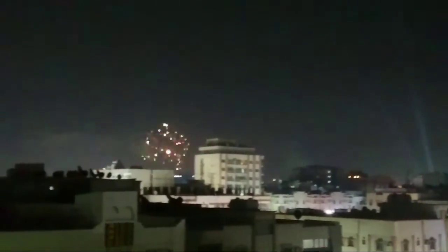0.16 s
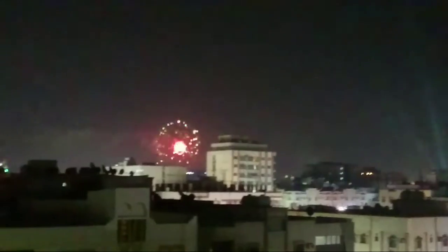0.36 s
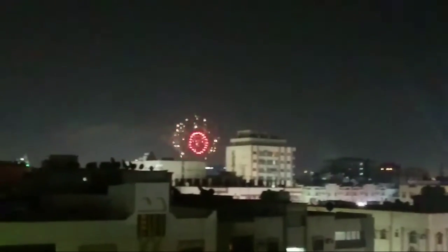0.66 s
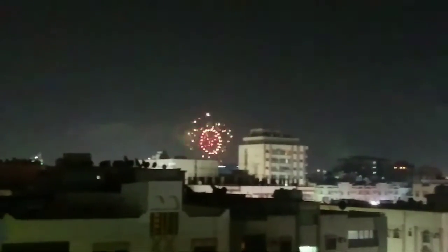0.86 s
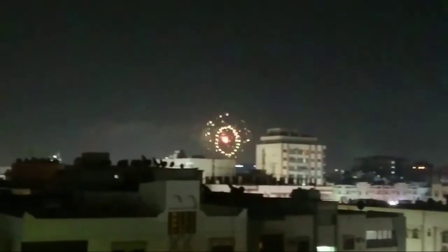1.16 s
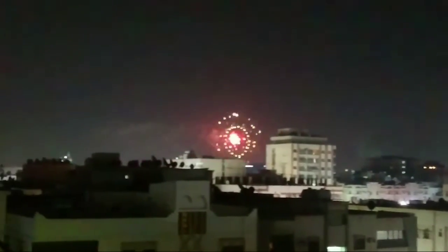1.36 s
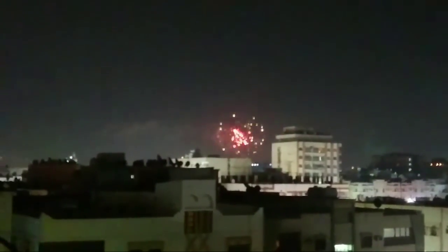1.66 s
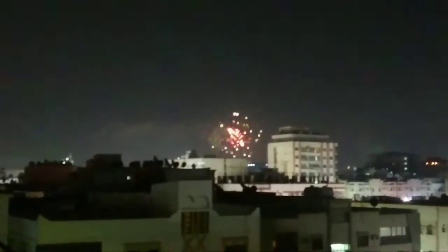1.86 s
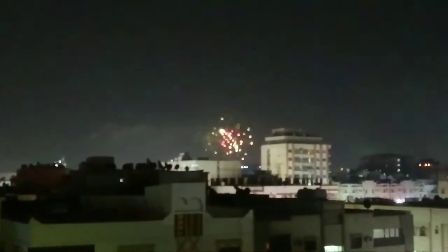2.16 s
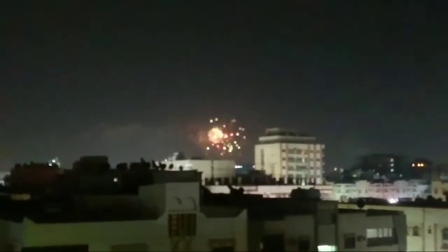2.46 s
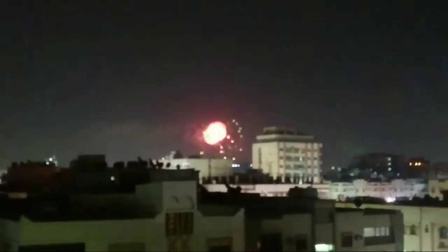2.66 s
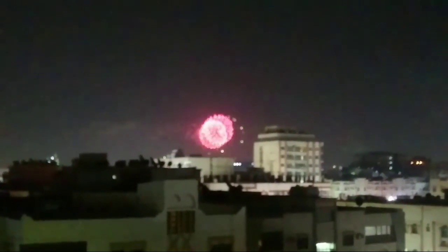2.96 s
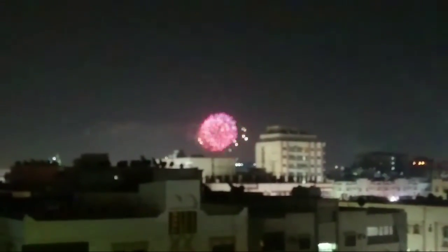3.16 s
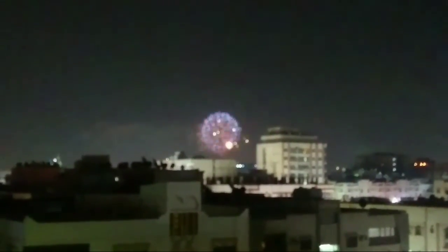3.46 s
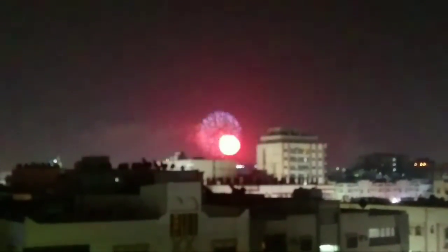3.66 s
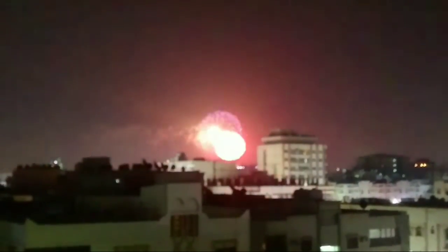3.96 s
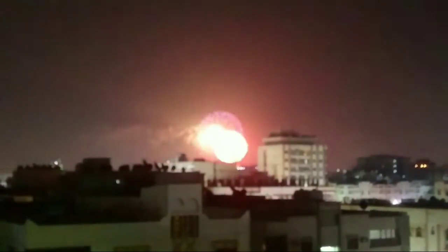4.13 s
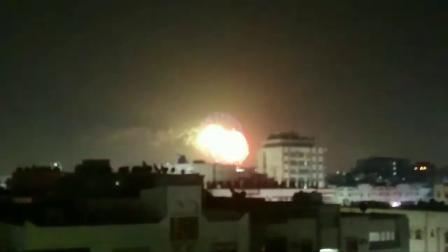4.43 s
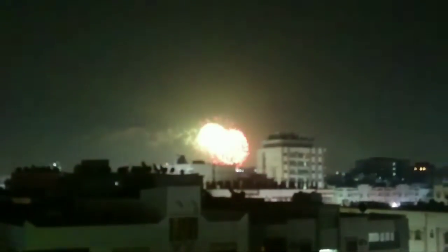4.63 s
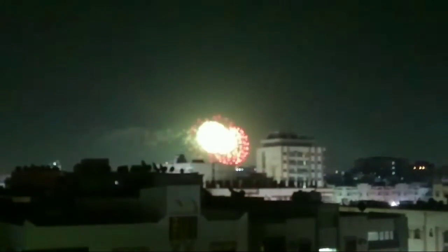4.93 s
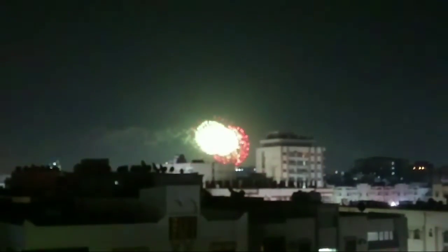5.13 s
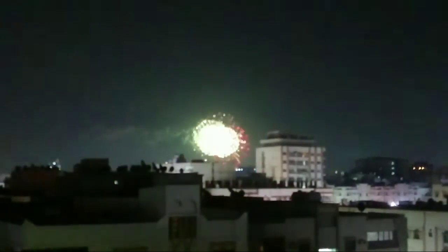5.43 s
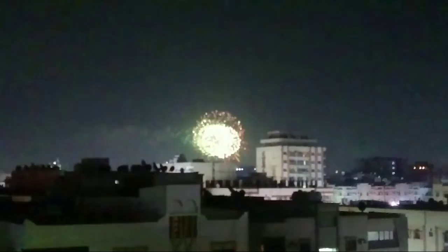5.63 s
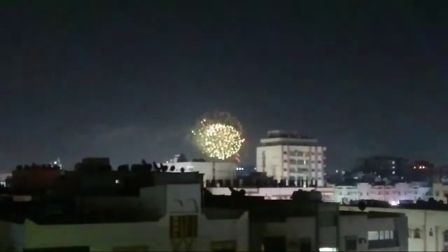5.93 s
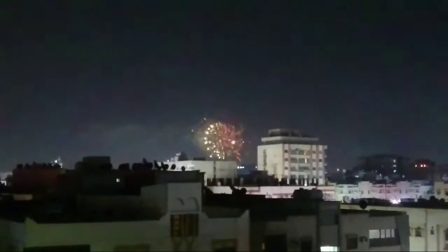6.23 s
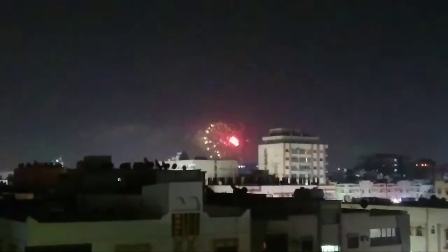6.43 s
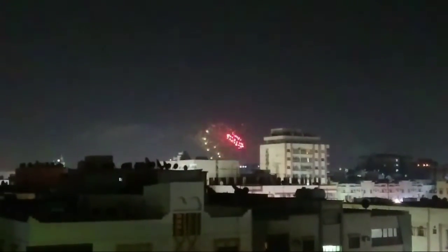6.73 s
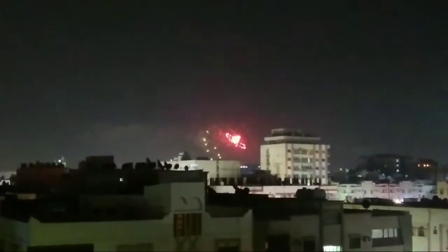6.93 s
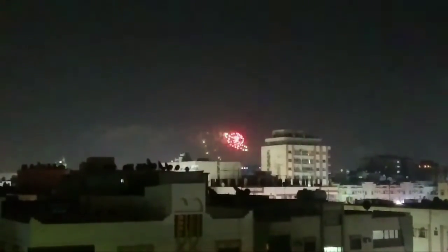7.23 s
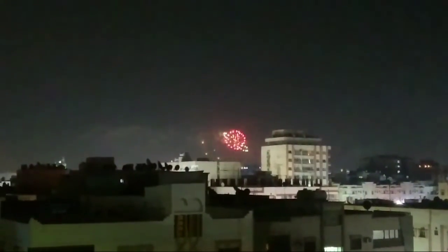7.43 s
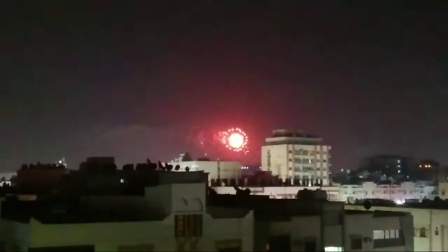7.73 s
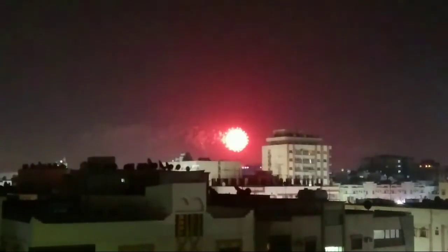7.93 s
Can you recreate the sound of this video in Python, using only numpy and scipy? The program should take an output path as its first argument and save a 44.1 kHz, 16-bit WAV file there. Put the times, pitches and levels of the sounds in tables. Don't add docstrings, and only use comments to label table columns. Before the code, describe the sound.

Distant aerial fireworks heard from a walled roof terrace. Rapid, overlapping bangs open the scene, thin out into weaker thumps and rumble, then give way to two close-spaced strong bangs, another alone, a long rumbling gap and two last ones. Each has a short dry crack, deep boom, quick echoes and rolling tail. Steady dull city hum sits underneath, stereo and slightly heavier on one side.

```python
import sys
import numpy as np
from scipy import signal
from scipy.fft import rfft, irfft
from scipy.io import wavfile
from scipy.ndimage import uniform_filter1d

SR = 44100
rng = np.random.default_rng(int(sys.argv[2]) if len(sys.argv) > 2 else 0)


def master_out(mix):
    frames = np.transpose(np.atleast_2d(mix))
    ceiling = np.clip(frames, -1, 1)
    pcm = np.round(ceiling * 32767).astype(np.int16)
    wavfile.write(sys.argv[1], SR, pcm)


def to_linear_factor(level_db):
    exponent = np.asarray(level_db, float) / 20
    return 10 ** exponent


N = 356769

# f/Hz, density/dB per Hz
TOWN_HUM = [(15, -47), (25, -47.5), (48, 6.5), (151, 2), (202, -16), (232, 7.5), (261, -8.5), (295, -2.5),
            (615, -8.5), (730, -9.5), (1500, -16.5), (1950, -49.5), (3300, -120)]
# f/Hz, density/dB per Hz
TOWN_HISS = [(1200, -25), (1500, 1), (2100, -1), (3000, -6), (4000, -6.5), (5500, -9), (6400, -8.5),
             (7300, -16), (8500, -21.5), (11000, -21), (12000, -28.5), (13500, -21.5), (14900, -30.5)]
TOWN_HUM_DB, TOWN_HISS_DB = -44.5, -57.5
# f/Hz, correlation
PORT_LIKENESS = [(60, 0.22), (100, 1), (300, 0.63), (520, 0.64), (900, 0.39), (1500, 0.45), (2600, 0.08),
                 (6000, 0.092), (12000, 0.3)]
# f/Hz, level/dB
TOWN_LEAN = [(60, -5), (110, -5.5), (210, -6.5), (390, -2.5), (740, -3.5), (1390, -2.5), (2600, -3.0)]
# f/Hz, width/Hz, level/dB
FANS = [(233, 2.2, -58), (1062, 24, -69.5), (1140, 10, -93), (542, 6.9, -73.5)]

# t/s, blast
# level/dB, boom level/dB, blast length/ms, echo level/dB
BURSTS = [(0.4109, -22, -41.5, 0.82, -36), (.416, -15, -17.5, 0.8, -30.5), (0.65, -12, -14.5, 0.56, -40),
          (.719, -14.5, -7.5, 0.6, -32), (0.7859, -13.5, -14, 0.7, -37), (1.045, -24, -14.5, 0.94, -45),
          (1.058, -16, -15.5, 0.58, -41.5), (1.133, -20, -26, .45, -36), (1.1599, -8.5, -12, 0.65, -28.5),
          (1.726, -27.5, -21.5, 0.6, -39.5), (1.756, -19.5, -19, 0.68, -44), (1.812, -17.5, -22, 0.89, -45),
          (1.847, -31, -27.5, 0.87, -44), (2.084, -27.5, -20.5, .9, -59), (2.089, -24.5, -34, 0.71, -40),
          (2.138, -31.5, -32, 0.73, -49), (2.401, -36.5, -33.5, 0.7, -49), (3.6784, -8.5, -13, 0.53, -27.5),
          (4.0246, -10.5, -13, .6, -35), (4.0996, -27, -53, .35, -50), (5.1158, -10.5, -13, .71, -28.5),
          (7.257, -10.5, -14, 0.68, -32.5), (7.9825, -7.5, -15, 0.62, -39)]
# delay/ms, left level/dB, right level/dB
WALLS = [(4.9, -8, -9), (6.6, -16, -18), (10.2, -16, -17), (15.5, -20, -20)]
# delay/ms, level/dB, left port later by/ms, bass lost below f/Hz, treble lost above f/Hz
FACADES = [(75.3, -5, .1, 1200, 3000), (189, -9, -.2, 450, 1500), (252.2, -1, .3, 420, 2500),
           (257.5, -8, 0, 400, 1200), (320, 1, .35, 450, 1300), (330, -11, .35, 300, 800),
           (356, -3, .35, 900, 6000), (415, -17, .2, 400, 1200), (490, -18, .2, 400, 1200)]
# f/Hz, level/dB, t60/s, polarity at the microphone
TERRACE_MODES = [(59.56, -23, 1.65, -1.7), (72.9, -2, 0.49, 0.66), (74.9, -9, 1.6, 0.43),
                 (85.1, -24, 2.2, -1.22), (94, -10.5, 1.11, 0.87), (103.5, -28, 5.1, 0.97),
                 (115.5, 6.5, 0.29, -0.33), (153.6, -3, 0.35, -0.48), (185, 4, 0.12, -0.48),
                 (208.7, -13, 0.5, -0.59), (224.4, -2, 0.54, -0.084), (272.5, -20, 0.67, -0.91),
                 (343, -28, 0.47, 0.82), (324.9, -7, 0.3, 0.57), (390, -11.5, 0.077, -1.6),
                 (427, -2, 0.34, 0.07), (597, -25, 0.027, 0.5)]
# f/Hz, t60/s
ROLL_DECAY = [(50, 4.9), (120, 2.7), (300, 2.17), (800, 3.1), (2500, 2.36)]
# f/Hz, level/dB
ROLL_COLOUR = [(40, 3.5), (90, 12.5), (200, 21), (500, -7), (1200, -5.5), (3000, 2)]
# t/s, level/dB
THUDS = [(1.889, -26), (1.965, -29), (2.206, -38), (2.287, -25), (2.481, -35), (2.554, -29), (2.675, -32),
         (2.736, -30), (4.641, -43), (4.868, -29), (5.722, -34.5), (6.347, -33), (7.508, -22)]
# f/Hz, level/dB
FIREWORKS_LEAN = [(60, -6.5), (130, -3), (270, -5.5), (580, -1.5), (1220, -2), (2600, -2)]

SWELL_MS, SWELL_MS_PER_DB, SHORTEST_SWELL_MS = 4.03, 0.63, 1.1
SPLASH_DB, SPLASH_HZ, SPLASH_T60_S = -12, 2200, 0.033
OPEN_SHARE = 0.72
HIDDEN_DB, ROLL_DB_PER_DB = -16, 0.4
LUMPY_DB = 4.5
THUD_THIN_HZ = 124


def evened(x):
    return x / np.sqrt(np.mean(x ** 2) + 1e-20)


def read(points, hz):
    f, value = np.transpose(points)
    return np.interp(np.log(hz + 1), np.log(f + 1), value)


def add(mix, s, sound):
    part = mix[..., max(round(s * SR), 0):][..., :sound.shape[-1]]
    part += sound[..., :part.shape[-1]]


def dull(x, hz, order=1, kind="low"):
    return signal.lfilter(*signal.butter(order, np.clip(hz, 10, SR / 2.2), kind, fs=SR), x)


def leaning(x, lean):
    hz = np.fft.rfftfreq(x.shape[1], 1 / SR)
    port_db = np.outer([0.5, -0.5], read(lean, hz))
    return irfft(rfft(x) * to_linear_factor(port_db), x.shape[1])


def night_air(spectrum, db, patchy_db, swell_db):
    frames = N // 512 + 5
    hz = np.fft.rfftfreq(2048, 1 / SR)
    a, b, c, d, patches = rng.standard_normal((frames, 1025, 5)).T
    patches = uniform_filter1d(patches, 10, axis=0)
    patches = evened(uniform_filter1d(patches, 8, axis=1))
    swell = evened(uniform_filter1d(rng.standard_normal(frames), 20))
    same = np.clip(read(PORT_LIKENESS, hz), -1, 1)[:, None]
    right = a + 1j * b
    own = c + 1j * d
    lead_s = 0.00036 / (1 + (600 / (hz + 1)) ** 4)
    lead = np.exp(2j * np.pi * hz * lead_s)[:, None]
    left = lead * same * right + np.sqrt(1 - same ** 2) * own
    level_db = read(spectrum, hz)[:, None] + patchy_db * patches + swell_db * swell
    z = np.array([left, right]) * to_linear_factor(level_db)
    air = signal.istft(z, nperseg=2048, noverlap=1536)[1][:, :N]
    return to_linear_factor(db) * evened(air)


def fans():
    t = np.arange(N) / SR
    out = np.zeros(N)
    for hz, width_hz, db in FANS:
        waver = dull(rng.standard_normal((2, N)), 10 + width_hz, order=2)
        waver = dull(waver, 10 + width_hz) / waver.std()
        steady = (1.7 + waver[0]) * np.cos(2 * np.pi * hz * t)
        out += to_linear_factor(db) * evened(steady + waver[1] * np.sin(2 * np.pi * hz * t))
    return out


def blast(length_ms, bounce, bounce_ms):
    u = np.arange(800) / SR / (length_ms / 1000)
    wave = (1 - u) * np.exp(-0.4 * u)
    wave = wave * np.clip(3 - u, 0, 1) * np.clip(6 * u, 0, 1)
    wave = dull(wave, 650 / length_ms, order=2)
    wave = dull(wave, 10000, order=2)
    wave = dull(wave, 79, kind="high")
    wave = wave / abs(wave).max()
    out = wave.copy()
    add(out, bounce_ms / 1000, bounce * wave)
    return out


def clutter():
    t = np.arange(4000) / SR
    left, right = rng.standard_normal((2, 4000)) * (rng.random((2, 4000)) < 0.04)
    taps = np.array([0.7 * np.roll(right, -13) + 0.7 * left, right]) * (t > 0.003)
    slow = to_linear_factor(-22 - 60 * t / 0.46) * dull(taps, 870)
    quick = to_linear_factor(-16 - 60 * t / 0.08) * dull(taps, 3000)
    splash = dull(rng.standard_normal((2, 4000)), SPLASH_HZ, order=2, kind="high") * (t > 0.004)
    taps = dull(slow + quick, 280, kind="high")
    taps = taps + to_linear_factor(SPLASH_DB - 60 * t / SPLASH_T60_S) * splash
    taps[:, 0] = 1
    shifts_ms = rng.uniform(-0.25, 0.41, len(WALLS))
    for (ms, left_db, right_db), shift_ms in zip(WALLS, shifts_ms):
        add(taps[0], (ms + shift_ms - 0.32) / 1000, to_linear_factor([left_db]))
        add(taps[1], (ms + shift_ms) / 1000, to_linear_factor([right_db]))
    return taps


def terrace():
    t = np.arange(SR) / SR
    ring = np.zeros(SR)
    for hz, db, t60, sign in TERRACE_MODES:
        ring += sign * to_linear_factor(db - 60 * t / t60) * np.sin(2 * np.pi * hz * t)
    return ring


def town_roll():
    taps = np.zeros((2, 2 * SR))
    slots = np.arange(round(0.03 * SR), 2 * SR - 30, 30)
    shape = (2, len(slots))
    at = slots + rng.integers(0, 30, shape)
    np.put_along_axis(taps, at, rng.choice([-1., 1.], shape), 1)
    likeness = 0.79
    taps[0] = likeness * taps[1] + np.sqrt(1 - likeness ** 2) * taps[0]
    hz, t, z = signal.stft(taps, SR, nperseg=512)
    lumps = uniform_filter1d(rng.standard_normal(z.shape[1:]), 4, axis=0)
    lumps = evened(uniform_filter1d(lumps, 5, axis=1))
    fall_db = 60 * t / read(ROLL_DECAY, hz)[:, None]
    z = z * to_linear_factor(LUMPY_DB * lumps + read(ROLL_COLOUR, hz)[:, None] - fall_db)
    tail = signal.istft(z, SR, nperseg=512)[1]
    tail = tail * (np.arange(tail.shape[1]) >= slots[0])
    return tail / np.linalg.norm(tail[1])


def facade_echoes(echo_db):
    heard = np.zeros((2, SR // 2 + 1000))
    for ms, db, late_ms, thin_hz, dull_hz in FACADES:
        back = dull(blast(0.55, 0.9, 2.0), dull_hz)
        back = dull(back, thin_hz, order=2, kind="high")
        back = to_linear_factor(echo_db + db + 7) * back / abs(back).max()
        add(heard[0], (ms + late_ms) / 1000, back)
        add(heard[1], ms / 1000, back)
    return heard


def thuds():
    out = np.zeros(N)
    lump = np.pad(np.hanning(100) / 50, (0, 2000))
    lump = dull(lump, THUD_THIN_HZ, order=4, kind="high")
    for s, db in THUDS:
        add(out, s, to_linear_factor(db - 6) * lump)
    return out


def fireworks():
    cracks, far, direct = np.zeros(N), np.zeros(N), np.zeros((2, N))
    pushes = thuds()
    for s, blast_db, boom_db, length_ms, echo_db in BURSTS:
        arrival = s + 0.0012
        wave = to_linear_factor(blast_db + 2) * blast(length_ms, 0.43, rng.uniform(1.8, 2.497))
        add(cracks, arrival, wave)
        near = clutter()
        add(direct, arrival, signal.fftconvolve(wave[None], near, axes=1))
        heard = facade_echoes(echo_db)
        cluttered = signal.fftconvolve(heard, near, axes=1)[:, :heard.shape[1]]
        add(direct, arrival, OPEN_SHARE * heard + (1 - OPEN_SHARE) * cluttered)
        push_ms = max(SWELL_MS + SWELL_MS_PER_DB * (boom_db - blast_db), SHORTEST_SWELL_MS)
        push = np.hanning(round(push_ms * SR / 1000) + 3)
        push = push / push.sum()
        add(pushes, arrival + 0.0008 - push_ms / 2000, to_linear_factor(boom_db + 3) * push)
        screened_db = min(ROLL_DB_PER_DB * max(HIDDEN_DB - blast_db, 0), 8)
        add(far, arrival, to_linear_factor(boom_db + 2.5 + screened_db) * push)
    boom = signal.fftconvolve(pushes, terrace())[:N]
    drive = to_linear_factor(-5.5) * cracks + to_linear_factor(20.5) * dull(far, 160)
    roll = signal.fftconvolve(drive[None], town_roll(), axes=1)[:, :N]
    return leaning(direct + boom + roll, FIREWORKS_LEAN)


def scene():
    hum = night_air(TOWN_HUM, TOWN_HUM_DB, patchy_db=1.4, swell_db=0.5)
    hiss = night_air(TOWN_HISS, TOWN_HISS_DB, patchy_db=0.8, swell_db=0.3)
    town = leaning(hum + hiss + fans(), TOWN_LEAN)
    return town + fireworks()


def top_cut(x):
    return signal.sosfilt(signal.butter(12, 14300, fs=SR, output="sos"), x)


def record(dry):
    hz = np.fft.rfftfreq(N, 1 / SR)
    cut = irfft(rfft(dry) / np.sqrt(1 + (48 / (hz + 1)) ** 8), N)
    power = uniform_filter1d((cut ** 2).mean(0), 800)
    power_db = 10 * np.log10(abs(power) + 1e-12)
    fall_db = np.arange(N) * 13.0 / SR
    held_db = np.maximum.accumulate(power_db + fall_db) - fall_db
    over_db = np.maximum(held_db + 20.0, 0)
    ducked = cut / to_linear_factor(0.12 * uniform_filter1d(over_db, 400))
    top = irfft(rfft(ducked) / (1 + (10500 / (hz + 1)) ** 12), N)
    mix = ducked - top * (1 - to_linear_factor(-1.1 * uniform_filter1d(over_db, 2000)))
    return top_cut(mix)


dry = scene()
out = record(dry)
master_out(out)
```